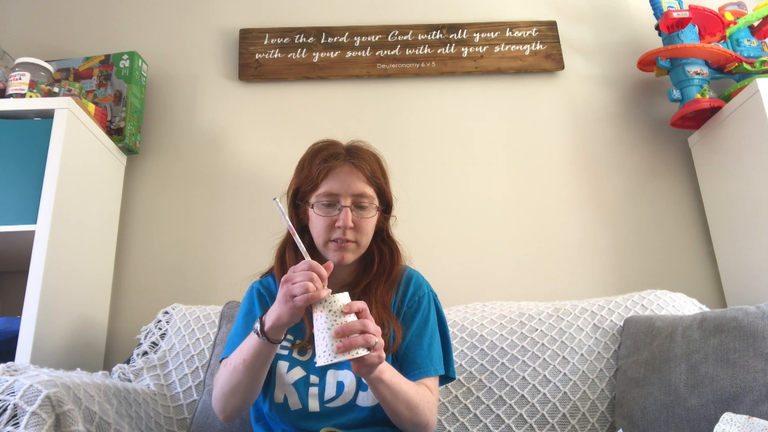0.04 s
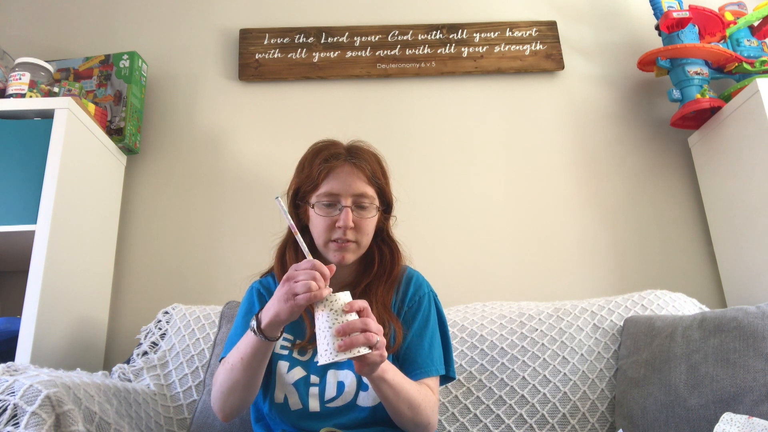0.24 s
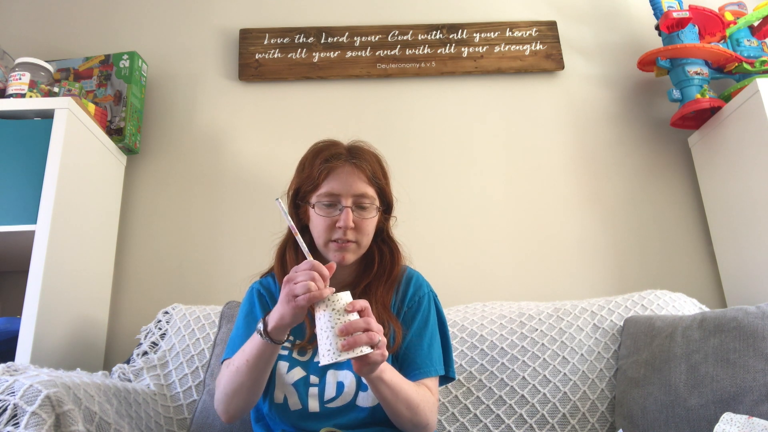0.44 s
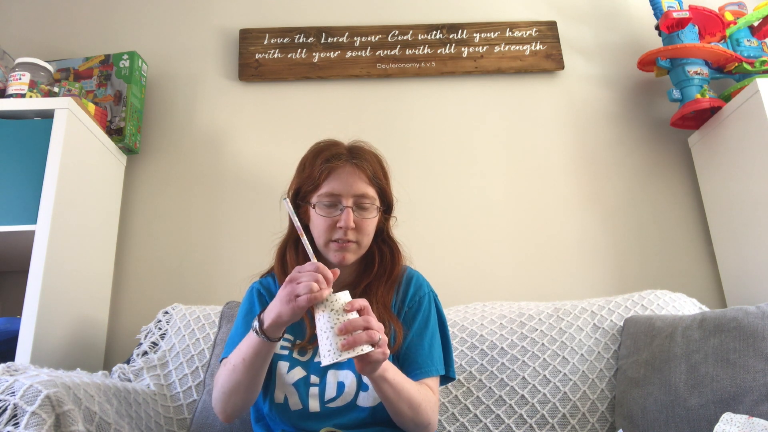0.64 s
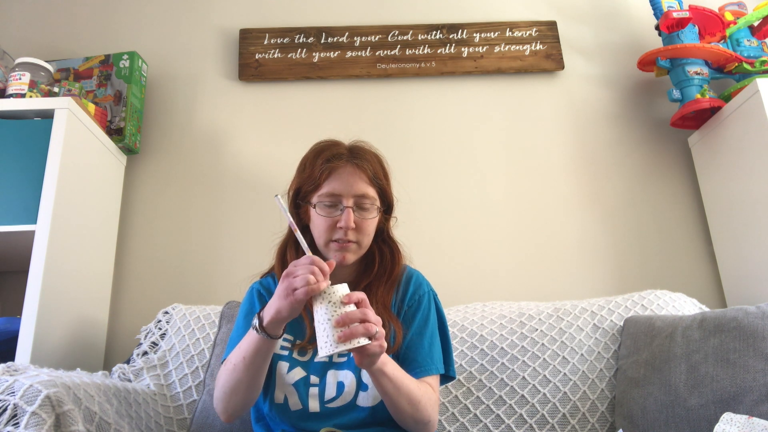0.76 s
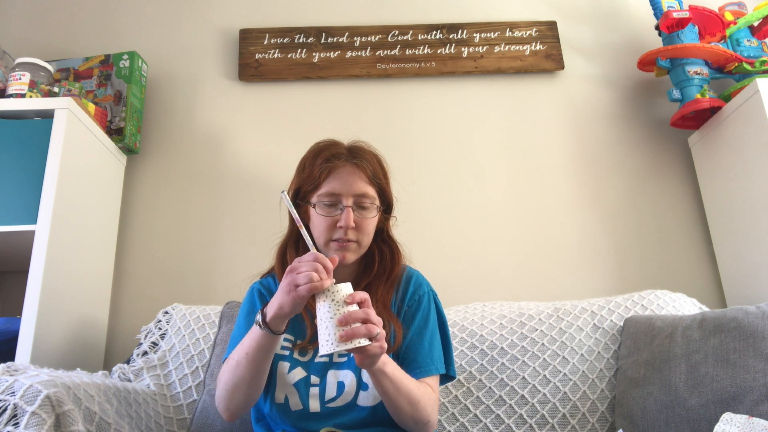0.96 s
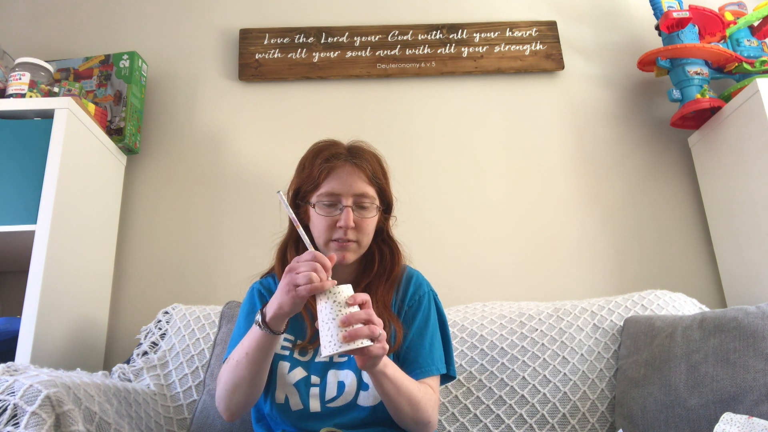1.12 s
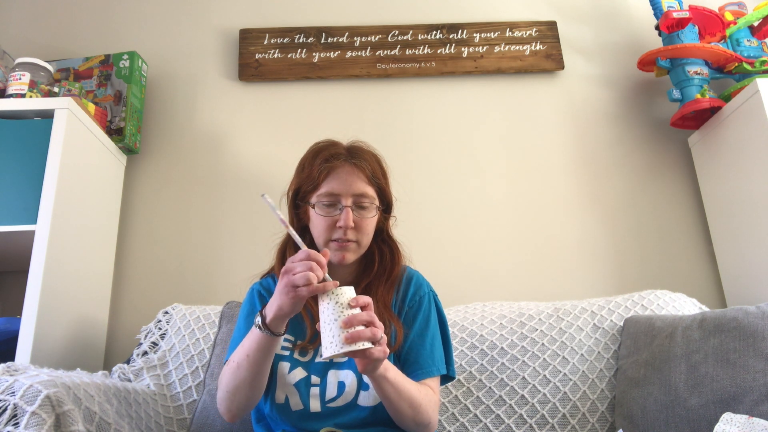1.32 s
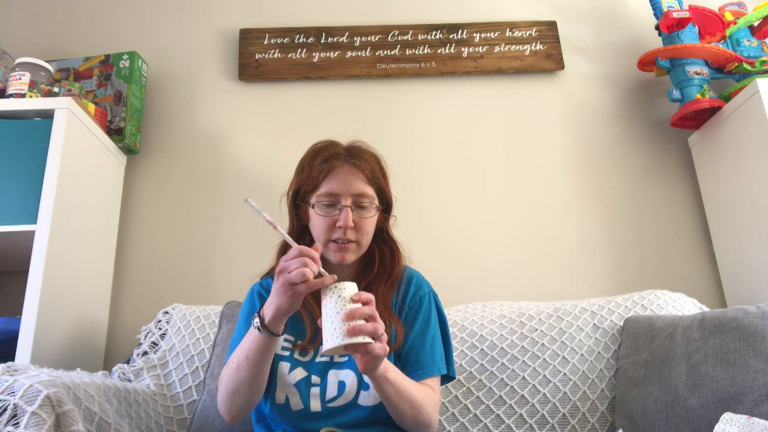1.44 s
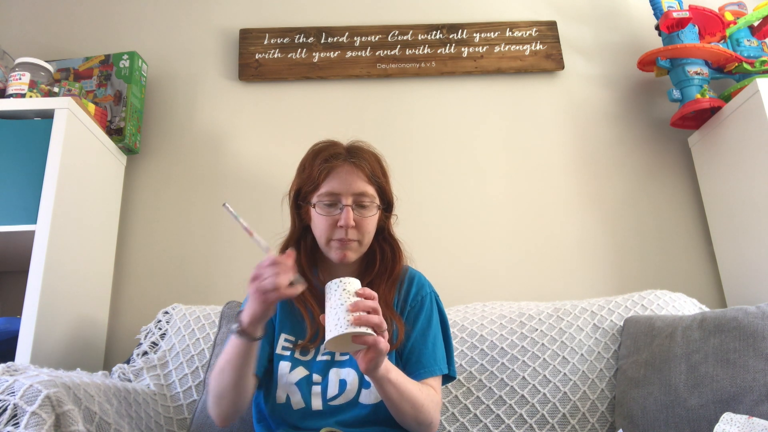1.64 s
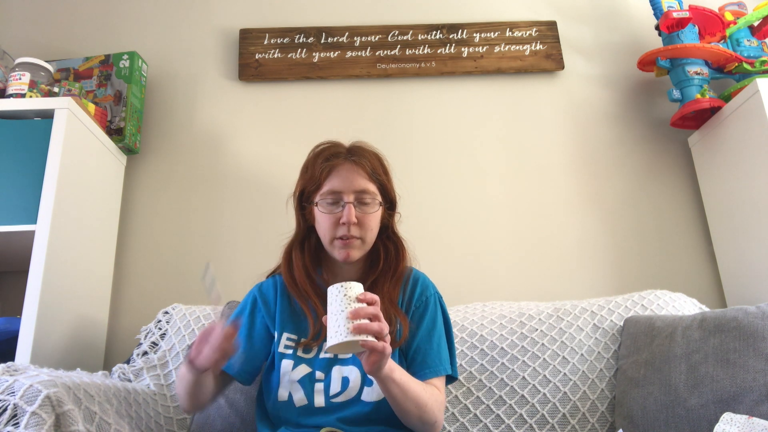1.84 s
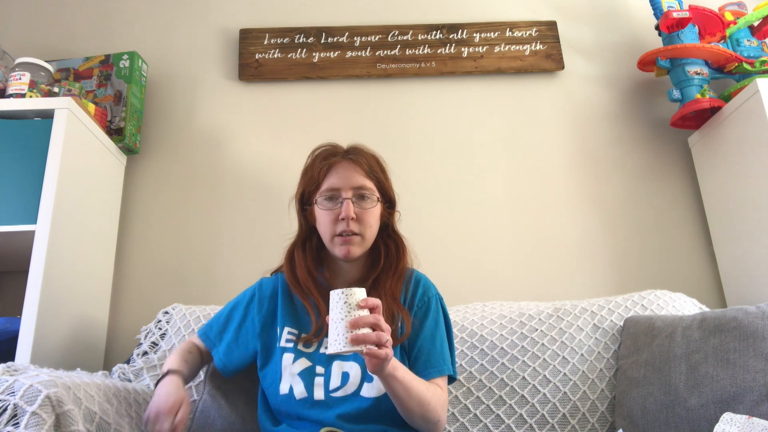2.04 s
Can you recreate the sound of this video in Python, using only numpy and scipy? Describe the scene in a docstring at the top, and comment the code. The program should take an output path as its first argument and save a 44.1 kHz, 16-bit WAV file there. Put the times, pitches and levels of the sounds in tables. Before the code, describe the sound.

A pointed stick is pushed through a paper cup. Faint ticks and scratching open, with a dull dimple knock at 0.22 s and small slip clicks around 0.43-0.48 s. Paper tears with sharp cracks at 0.6-0.65 s. At 1.07-1.15 s it breaks through with loud hollow pops and a shaft scrape. Soft finger bumps, ticks and sleeve rustle follow from 1.4 s, over quiet room noise with short reverberation.

```python
"""A pointed stick is pushed through a hand-held paper cup in a living room.
The tip scratches and clicks as dense grains and pulses; the paper tears as grains and cracks as ringing pulses.
It breaks through with a rip, hollow pops of ringing wall modes, and the grainy scrape of the shaft.
Noise ticks, two-partial finger bumps and a rustling sleeve follow as the stick is drawn out.
A diffuse room tail answers, over a steady floor of shaped noise."""
import sys
import numpy as np
from scipy import signal
from scipy.fft import rfft, irfft, next_fast_len
from scipy.io import wavfile
from scipy.ndimage import map_coordinates

SR = 44100
rng = np.random.default_rng(int(sys.argv[2]) if len(sys.argv) > 2 else 0)


def master(y):
    """Save y as 16-bit WAV."""
    cut = np.clip(np.atleast_2d(y).T, -1, 1)
    pcm = np.round(cut * 32767)  # scale
    wavfile.write(sys.argv[1], SR, pcm.astype(np.int16))


N = 91728
T = np.arange(SR * 3 // 5) / SR  # clock of one short event [s]

# Quiet room noise: [f/Hz, relative level/dB]
FLOOR = [(20, -29), (32, -11), (48, -5), (70, 0), (110, -4), (170, -5.5), (280, -6), (430, -9.5),
         (700, -12), (1200, -13.5), (1700, -18.5), (2600, -23), (3500, -23.5), (6000, -26), (10000, -33),
         (15500, -33.5)]
FLOOR_DB = -57.5  # rms

# Room decay: [f/Hz, t60/s]
ROOM_T60 = [(250, 0.42), (500, 0.31), (900, 0.38), (2200, 0.38), (4200, 0.36), (8000, 0.29), (14000, 0.23)]
# Spectrum of the room's answer: [f/Hz, gain/dB]
ROOM_COLOUR = [(200, -11), (450, 1), (800, -3), (1300, -5), (2000, -4.5), (4000, 2.5), (8000, 3),
               (15000, -6)]
# tail energy before its colouring, first delay, build-up time
ROOM_DB, ROOM_DELAY_S, ROOM_BUILD_S = -6, 0.00067, 0.0024

# Sleeve rustle, before its trim: [t/s, level/dB]
SLEEVE_LEVEL = [(1.3, -80), (1.42, -64), (1.55, -66.5), (1.66, -64.5), (1.78, -70.5), (1.87, -59),
                (1.97, -55.5), (2.08, -61.5)]
# Sleeve cloth: [f/Hz, relative level/dB]
SLEEVE_COLOUR = [(400, 1), (1200, -0.5), (3500, -1.5), (5000, -6), (6800, -3.5), (9000, -9), (10500, -16),
                 (15000, -8.5)]
# Dry ticks of tip and fingernails, before their trim: [t/s, level/dB, centre f/Hz, width/octaves, t60/s]
TICKS = [(0.037, -38, 3050, 1.1, 0.013), (.078, -44, 6000, 1.8, 0.016), (0.096, -69, 3930, 1.8, 0.014),
         (1.494, -49, 3740, 1, 0.023), (1.534, -41.5, 2000, 0.68, 0.023), (1.597, -35.5, 2650, 0.57, 0.013),
         (1.6, -44, 2900, 0.16, 0.092), (1.684, -50, 4200, 0.77, 0.023), (1.809, -35, 14600, 0.28, 0.0068),
         (1.8325, -34, 2140, 1.2, 0.011), (1.855, -42.5, 3760, 0.26, 0.015)]
SLEEVE_TRIM_DB, TICK_TRIM_DB = -3.5, -7.5
# Soft finger bumps: [t/s, level/dB, lower partial f/Hz, t60/s]
BUMPS = [(1.389, -49.5, 244, 0.26), (1.424, -35.5, 292, 0.016), (1.495, -35.5, 298, 0.01),
         (1.533, -35.5, 298, 0.044), (1.597, -36.5, 324, 0.021), (1.604, -34, 192, 0.013),
         (1.885, -45.5, 397, 0.027)]

# The base dimples under the tip: [t/s, peak level/dB]
DENTS = [(.2225, -35), (.2272, -30)]
# Dull knock of a dimple: [f/Hz, relative level/dB]
DENT_COLOUR = [(150, -42), (520, -11), (820, 5), (1050, -2), (1300, 0), (1700, -10), (2100, -8.5),
               (3200, -19.5), (4300, -14.5), (6000, -20.5), (15000, -31.5)]
# The tip catches on the paper: [t/s, peak level/dB]
SLIPS = [(.4296, -40), (.459, -55), (.4775, -26.5)]
# Small click of a slip: [f/Hz, relative level/dB]
SLIP_COLOUR = [(200, -50), (800, -9), (1200, -4), (1800, -20), (2200, 6), (2800, 4), (3300, -8), (4250, 5),
               (5500, -9), (7500, -7), (10500, -9), (12400, -3), (15000, -27)]

# Tip scratching on the paper: [t/s, level/dB]
SCRATCH_LEVEL = [(0, -49.5), (.04, -56.5), (.1, -57), (.14, -68.5), (.21, -64.5), (.26, -61), (.38, -64.5),
                 (.44, -63), (.52, -60), (.58, -64)]
# Scratched paper: [f/Hz, relative level/dB]
SCRATCH_COLOUR = [(290, -28), (500, -13), (716, -1), (769, -24), (851, -5), (1150, -6), (1290, -20),
                  (2230, -0.5), (3380, -7.5), (5200, -12.5), (5830, -14), (12100, -16), (15500, -15)]
# Fibres parting round the tip: [t/s, level/dB]
TEAR_LEVEL = [(.57, -71), (.597, -52), (.608, -40.5), (.618, -42), (.632, -39), (.637, -24.5),
              (.648, -27.5), (.654, -21), (.668, -42.5), (.69, -70.5)]
# Torn fibres: [f/Hz, relative level/dB]
TEAR_COLOUR = [(120, -64), (200, -54), (310, -44), (437, -15.5), (564, -21), (798, -9), (1280, -13.5),
               (1590, -9.5), (1740, -14), (2510, -9), (3360, -13), (4030, -14.5), (6130, -28.5),
               (7220, -24), (15500, -31)]
# Cracks of the tearing base: [t/s, peak level/dB, treble tilt/(dB per octave), ring level re peak/dB]
CRACKS = [(.6075, -33, 0, -15), (.6352, -20, 5.5, -66), (.6386, -9, 0.5, -56), (.6423, -6, -2.5, -24),
          (.6452, -10, 0, -25.5), (.6484, -10.5, 2.5, -63)]
# Crack before its tilt: [f/Hz, relative level/dB]
CRACK_COLOUR = [(120, -55), (250, -44), (480, -21), (680, -6.5), (810, -1.5), (1000, -8.5), (1250, -12.5),
                (1600, 3.5), (1950, 0.5), (2500, -8.5), (3400, -17), (4200, -11.5), (5500, -37),
                (7300, -19.5), (9700, -51), (11400, -24.5), (15500, -39)]
# Ringing of the taut base: [f/Hz, relative level/dB, t60/s]
CRACK_MODES = [(832, -6, 0.45), (840, 2, 0.26), (1430, -19, 0.5), (1587, -9.5, 0.55), (1579, -7, .37),
               (2016, -8.5, 0.35), (2448, -7, 0.27), (2606, -1.5, .26), (3780, -6, .28), (4020, -22, .25),
               (4060, -9, 0.21)]

# Last short rip: [f/Hz, relative level/dB]
RIP_COLOUR = [(500, -3), (2000, 7.5), (4500, -5.5), (8000, -6), (11000, -25), (15000, -11)]
# Shaft sliding through the hole: [t/s, level/dB]
SLIDE_LEVEL = [(1.076, -32), (1.081, -37.5), (1.11, -26), (1.12, -35), (1.134, -25), (1.146, -31),
               (1.165, -65)]
# Scraping shaft: [f/Hz, relative level/dB]
SLIDE_COLOUR = [(100, -45), (250, -36.5), (400, -19), (600, -12), (720, -2), (830, -14), (1050, 4),
                (1200, -22), (1400, -8), (1800, -16.5), (2200, -9), (3100, -32), (4100, -26.5), (5000, -31),
                (6500, -31), (10500, -43.5), (15500, -49.5)]
# Hollow pops of the cup wall: [t/s, peak level/dB, treble tilt/(dB per octave), ring level re peak/dB]
POPS = [(1.0675, -44, -12, -28), (1.0795, -2.5, -0.5, -24.5), (1.0893, -13, -1, -32),
        (1.1045, -35, -8.5, -41), (1.1305, -15, -1, -18), (1.1346, -15, -2, -17)]
# Pop before its tilt: [f/Hz, relative level/dB]
POP_COLOUR = [(100, -74), (250, -32.5), (400, -27.5), (650, -0.5), (1050, 2), (1400, -6), (1850, -21),
              (2300, -17.5), (3000, -28.5), (4100, -30.5), (5200, -44), (8000, -35.5), (10500, -44.5),
              (15500, -59)]
# Ringing of the pierced cup: [f/Hz, relative level/dB, t60/s]
POP_MODES = [(731, 0.5, 0.13), (818, -28, 0.12), (942, -13, 0.23), (987, -12.5, 0.78), (1051, 6, 0.2),
             (1290, -12, 0.42), (2088, -13, .33), (2208, -11, 0.34), (2340, -30, 0.33), (4095, -17, 0.22),
             (4080, -18, 0.19)]

WAVER_RATE, WAVER_RAD, WAVER_DB = 70, .55, 2.5  # knots/s, phase depth, level depth
TOP_HZ = 15800  # recorder band limit


def amp(db):
    """Decibels to linear gain."""
    return 10 ** (np.asarray(db) / 20)


def unit(x):
    """Scale to rms 1."""
    return x / np.sqrt(np.mean(x ** 2) + 1e-20)


def along(points, hz):
    """Read a (f/Hz, value) curve on a log frequency axis."""
    f, v = np.transpose(points)
    return np.interp(np.log(hz + 1), np.log(f + 1), v)


def level(rows):
    """Gain per sample from (t/s, level/dB) rows, practically silent outside them."""
    s, db = np.transpose(rows)
    return amp(np.interp(np.arange(N) / SR, s, db, left=-120, right=-120))


def add(track, s, x):
    """Mix x into the track at time s, cut at the track's end."""
    part = track[max(round(s * SR), 0):][:len(x)]
    part += x[:len(part)]


def pulse(colour, size=4096):
    """A causal (minimum-phase) click with the given spectrum, peak 1."""
    gain = amp(along(colour, np.fft.rfftfreq(size, 1 / SR)))
    cepstrum = irfft(np.log(gain))
    # folding the cepstrum forward puts the energy right after the onset
    cepstrum[1:size // 2] *= 2
    cepstrum[size // 2 + 1:] = 0
    click = irfft(np.exp(rfft(cepstrum)))
    return click / np.abs(click).max()


def grains(colour, rate, spread_db):
    """Tiny clicks of uneven size at random times, rate per second, rms 1."""
    happens = rng.random(N) < rate / SR
    sign = rng.choice([-1, 1], N)
    size = amp(spread_db * np.clip(rng.standard_normal(N), -2, 2))
    return unit(signal.fftconvolve(happens * sign * size, pulse(colour))[:N])


def waver():
    """A quick smooth random curve, WAVER_RATE knots a second."""
    knots = rng.standard_normal(int(T[-1] * WAVER_RATE) + 2)
    return map_coordinates(knots, [T * WAVER_RATE], mode="nearest")


def ring(modes, attack_s):
    """Fading modes that waver in level and phase, so that the paper never rings like glass."""
    tones = np.zeros(len(T))
    for hz, db, t60 in modes:
        fade = amp(db + WAVER_DB * waver() - 60 * T / t60)
        tones += fade * np.sin(2 * np.pi * hz * T + WAVER_RAD * waver())
    return tones * (1 - np.exp(-T / attack_s))


def floor():
    """Steady rumble and hiss of the quiet room, as noise shaped in frequency."""
    gain = amp(along(FLOOR, np.fft.rfftfreq(N, 1 / SR)))
    noise = irfft(rfft(rng.standard_normal(N)) * gain, N)
    return amp(FLOOR_DB) * unit(noise)


def room(x):
    """The sound with its diffuse answer; each frequency dies at its own speed."""
    hz, t, z = signal.stft(rng.standard_normal(len(T)), SR, nperseg=256)
    fade = amp(-60 * t / along(ROOM_T60, hz[:, None]))
    tail = signal.istft(z * fade, SR, nperseg=256)[1][:len(T)]
    tail *= 1 - np.exp(-np.maximum(T - ROOM_DELAY_S, 0) / ROOM_BUILD_S)
    tail /= np.linalg.norm(tail)
    tail = irfft(rfft(tail) * amp(along(ROOM_COLOUR, np.fft.rfftfreq(len(T), 1 / SR))))
    return x + amp(ROOM_DB) * signal.fftconvolve(x, tail)[:N]


def sleeve():
    """Cloth rubs in many tiny, very uneven clicks."""
    cloth = grains(SLEEVE_COLOUR, rate=7000, spread_db=9)
    return amp(SLEEVE_TRIM_DB) * level(SLEEVE_LEVEL) * cloth


def ticks():
    """Hard little contacts of tip and fingernails: fading bursts of band-shaped noise."""
    out = np.zeros(N)
    hz = np.fft.rfftfreq(len(T), 1 / SR)
    for s, db, centre_hz, width, t60 in TICKS:
        band = 1 / (1 + (np.log2((hz + 1) / centre_hz) / width) ** 2)
        band /= np.sqrt(hz + centre_hz)  # softens the treble
        noise = unit(irfft(rfft(rng.standard_normal(len(T))) * band))
        add(out, s, amp(db + TICK_TRIM_DB - 60 * T / t60) * noise)
    return out


def bumps(attack_s=0.00057):
    """Soft fingers set off two inharmonic low partials that fade together."""
    out = np.zeros(N)
    for s, db, pitch_hz, t60 in BUMPS:
        envelope = amp(db - 60 * T / t60) * (1 - np.exp(-T / attack_s))
        low = np.sin(2 * np.pi * pitch_hz * T)
        high = 0.28 * np.sin(2 * np.pi * 2.15 * pitch_hz * T)
        add(out, s, envelope * (low + high))
    return out


def handling():
    """Sleeve, ticks and finger bumps share one answer of the room."""
    return room(sleeve() + ticks() + bumps())


def pressing():
    """Before it tears, the base dimples with a dull knock and the tip slips with small clicks."""
    out = np.zeros(N)
    for rows, colour in (DENTS, DENT_COLOUR), (SLIPS, SLIP_COLOUR):
        for s, db in rows:
            add(out, s, amp(db) * pulse(colour))
    return room(out)


def snaps(rows, colour, modes, attack_s, knee_hz=1200):
    """The paper gives way in sudden steps; each is a sharp push that sets the cup ringing."""
    push, rings = np.zeros(N), np.zeros(N)
    for s, db, tilt, ring_db in rows:
        # the tilt acts only above the knee
        tilted = [(hz, gain + tilt * np.log2(max(hz / knee_hz, 1))) for hz, gain in colour]
        add(push, s, amp(db) * pulse(tilted))
        add(rings, s, amp(db + ring_db) * ring(modes, attack_s))
    return room(push) + rings  # the ringing stays dry


def breakthrough(rip_s=1.0783, rip_db=-25, rip_t60=0.02):
    """A last short rip, the hollow pops, and the shaft scraping through the hole."""
    scrape = level(SLIDE_LEVEL) * grains(SLIDE_COLOUR, rate=5000, spread_db=1)
    rip = grains(RIP_COLOUR, rate=9800, spread_db=0.5)[:len(T)]
    add(scrape, rip_s, amp(rip_db - 60 * T / rip_t60) * rip)
    return room(scrape) + snaps(POPS, POP_COLOUR, POP_MODES, attack_s=0.0048)


def puncture():
    """The tip scratches, then fibres part in a swell of grains while the base cracks and rings."""
    scratch = level(SCRATCH_LEVEL) * grains(SCRATCH_COLOUR, rate=2500, spread_db=2)
    tear = level(TEAR_LEVEL) * grains(TEAR_COLOUR, rate=7600, spread_db=0.5)
    return room(scratch + tear) + snaps(CRACKS, CRACK_COLOUR, CRACK_MODES, attack_s=.002)


def scene():
    """Everything summed at one microphone."""
    mix = floor() + handling() + pressing() + breakthrough() + puncture()
    return mix[None]


def record(dry):
    """The recorder keeps nothing above its band limit."""
    m = next_fast_len(N + SR // 2)  # padded so that the filter does not wrap round
    kept = np.fft.rfftfreq(m, 1 / SR) < TOP_HZ
    return irfft(rfft(dry, m) * kept, m)[..., :N]


dry = scene()
out = record(dry)
master(out)
```